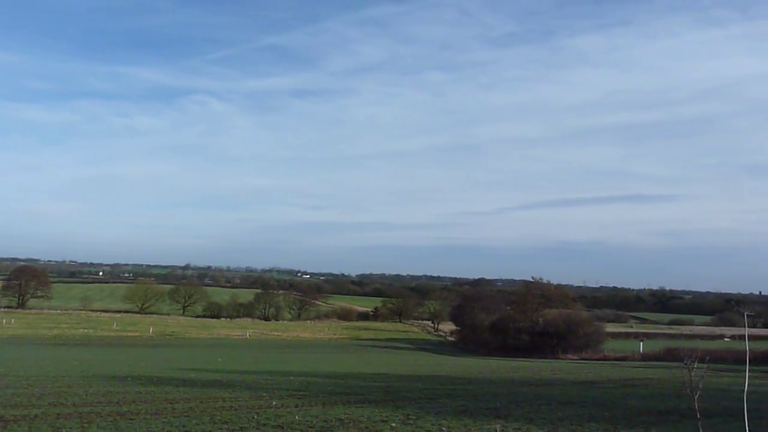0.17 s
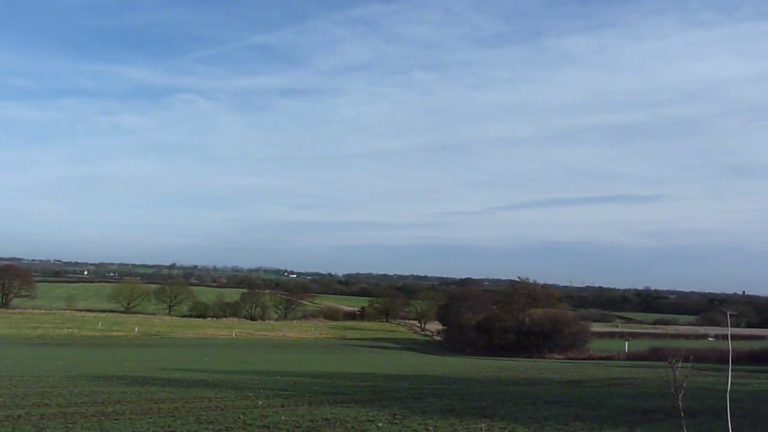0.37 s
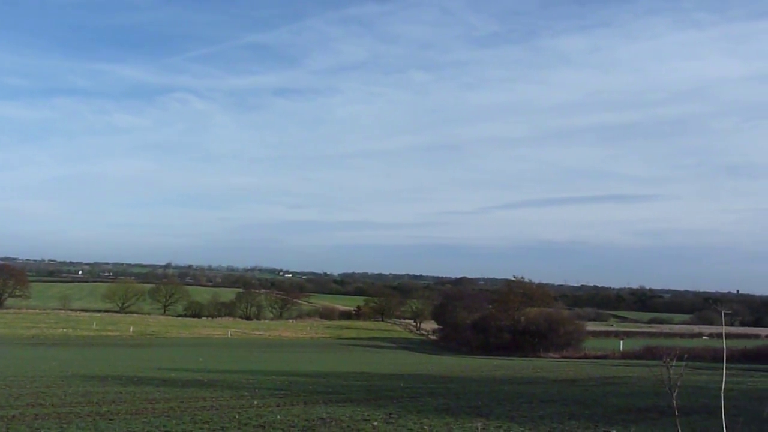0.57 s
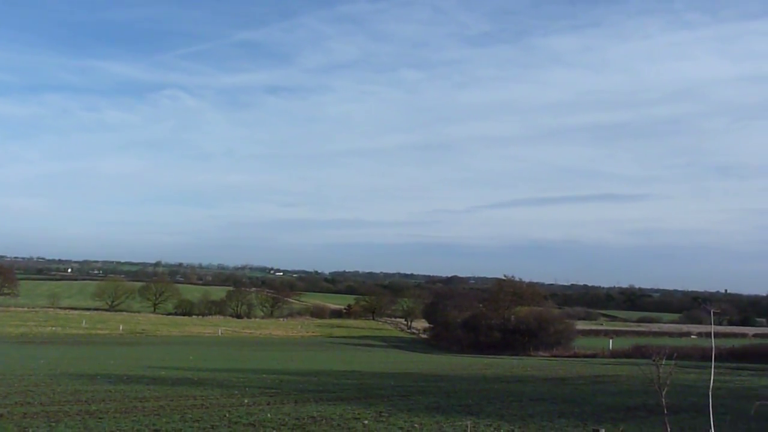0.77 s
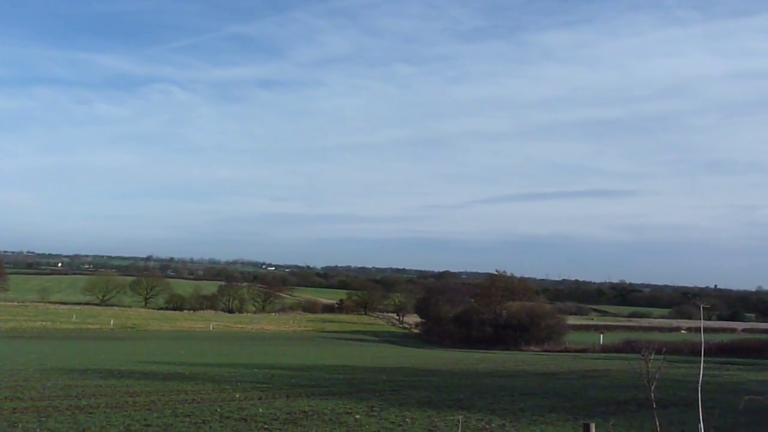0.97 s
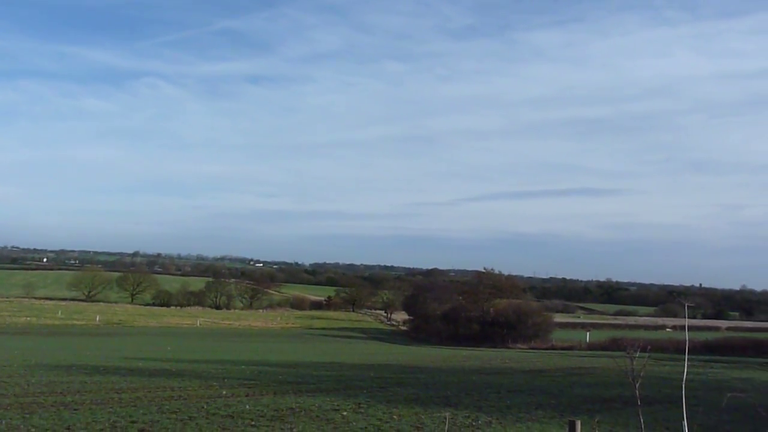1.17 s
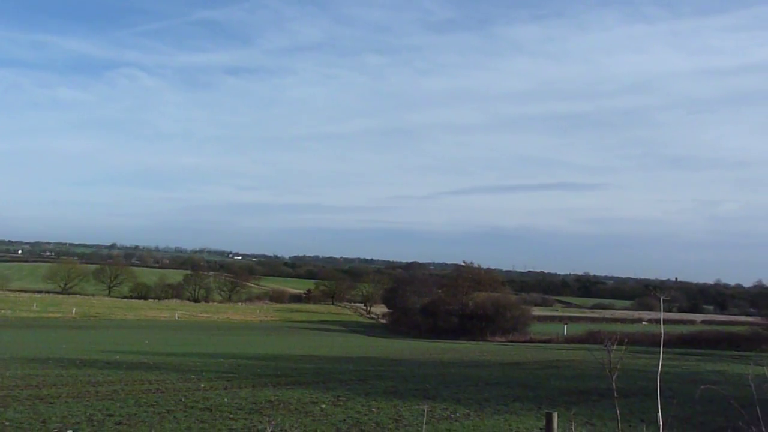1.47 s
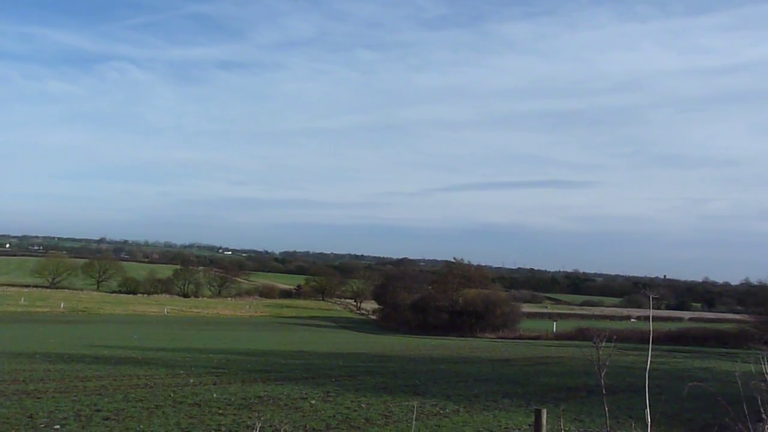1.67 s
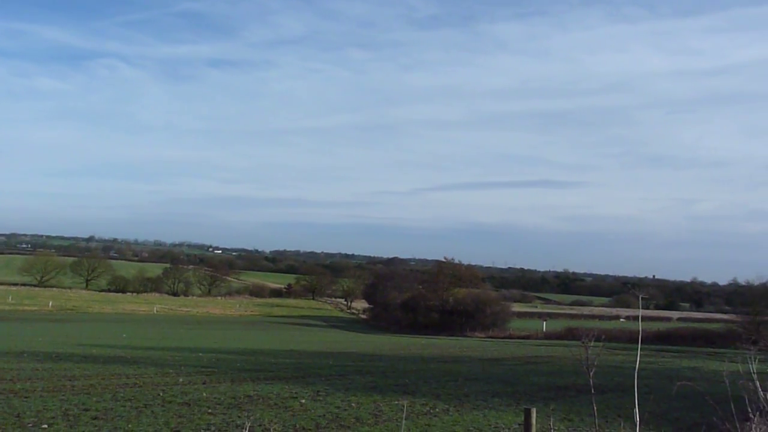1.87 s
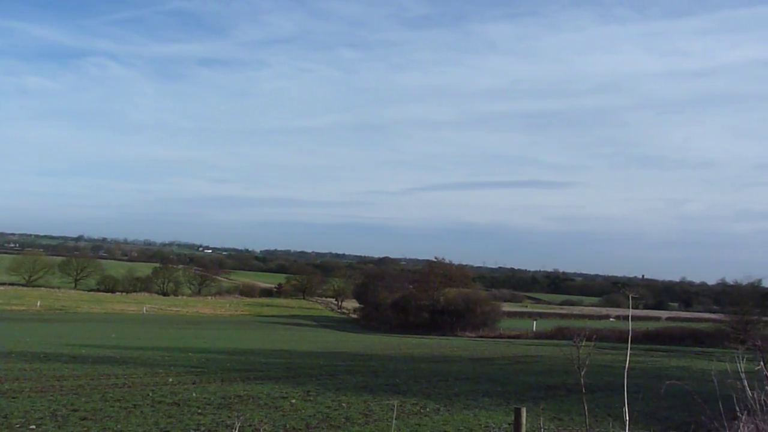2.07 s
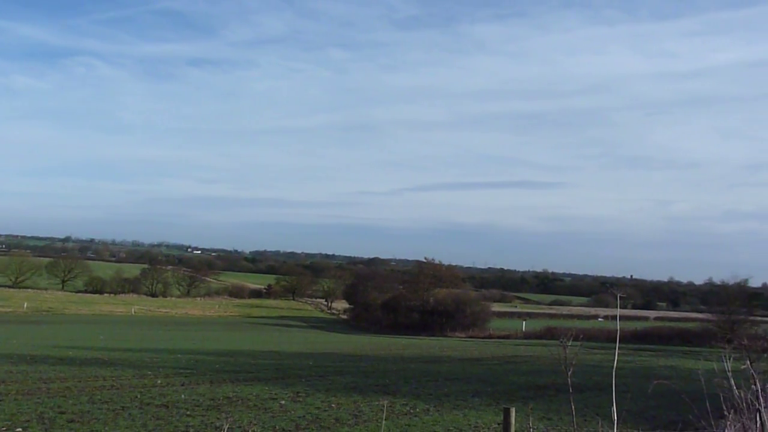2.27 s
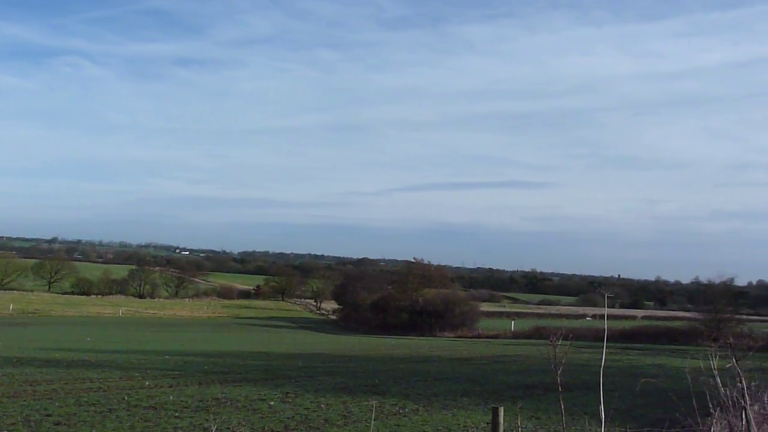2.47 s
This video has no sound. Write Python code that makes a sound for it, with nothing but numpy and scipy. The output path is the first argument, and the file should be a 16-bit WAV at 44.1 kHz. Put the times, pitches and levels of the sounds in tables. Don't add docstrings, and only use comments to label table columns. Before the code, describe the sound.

Small birds sing over a steady low distant traffic rumble and faint hiss. From 0 to 0.8 s, high falling slurs on the right overlap a clear low-high-low central whistle; a harsh call sweeps upward at 0.5 s. Brief buzzes come at 0.7 and 1.3 s, then sparse left chips until 2.5 s. Wind buffets at 1.4 s, a twig snaps right at 2.2 s, and low wind thumps hit around 2.4-2.5 s.

```python
import sys
import numpy as np
from scipy import signal
from scipy.fft import rfft, irfft, next_fast_len
from scipy.io import wavfile
from scipy.ndimage import uniform_filter1d, map_coordinates

SR = 44100
rng = np.random.default_rng(int(sys.argv[2]) if len(sys.argv) > 2 else 0)


def transcribe(signal):
    frames = np.atleast_2d(signal).T
    limited = np.clip(frames, -1, 1)
    pcm = np.round(limited * 32767).astype(np.int16)
    wavfile.write(sys.argv[1], SR, pcm)


def level_to_linear(level):
    exponent = np.asarray(level, float) / 20
    return 10 ** exponent


N = 115101
CAMERA_HZ = 16000

# pitch_hz, level_db (per Hz)
ROAR_TONE = [(15, -44.5), (25, -12.5), (80, 0), (109, -8.5), (342, -11.5), (541, -15), (643, -12.5),
             (1040, -18), (2400, -42), (3120, -81.5), (5280, -120)]
# time_s, level_db
ROAR_SWELL = [(0.0, -49), (0.55, -48.5), (1.29, -48), (1.56, -49.5), (2.11, -48.5), (2.61, -46.5)]
# centre_hz, width_hz, level_db
ENGINE_DRONES = [(325, 97, -56.5), (973, 4.2, -76), (63, 30, -64)]
# pitch_hz, wander_hz, level_db
ENGINE_ORDERS = [(82.4, 6.31, -50), (495.7, 1.3, -61.5)]
# time_s, level_db
GUSTS = [(0, -66.5), (.27, -71), (.38, -59), (.48, -75), (.72, -62.5), (.87, -79), (1.08, -64),
         (1.17, -70.5), (1.23, -59), (1.33, -74), (1.40, -47.5), (1.50, -62.5), (1.78, -59), (1.88, -70),
         (1.98, -58.5), (2.20, -78.5), (2.42, -45), (2.61, -49.5)]
# pitch_hz, level_db (per Hz)
BUFFET_TONE = [(12, -6), (25, -2.5), (55, -3.5), (90, 7), (140, -5.5), (250, -43.5)]
# pitch_hz, level_db (per Hz)
FLAP_TONE = [(80, -17.5), (140, 1.5), (250, -7), (450, -16.5), (700, -53.5)]
# time_s, pitch_hz, level_db
SLUR_PHRASES = [
    [(.004, 7750, -65), (.02, 7550, -66), (.042, 7380, -63), (.053, 6950, -67), (.062, 6450, -60),
     (.068, 6150, -74.5)],
    [(.142, 7550, -70), (.160, 7400, -76), (.175, 7100, -63), (.190, 6750, -62), (.197, 6200, -60),
     (.205, 5750, -73)],
    [(.328, 6150, -75), (.340, 5950, -62.5), (.350, 5650, -56), (.364, 5100, -58), (.372, 4800, -62.5),
     (.378, 4500, -68)],
    [(.378, 4050, -65), (.39, 3980, -73), (.40, 4000, -70), (.42, 3920, -81)],
    [(.446, 6400, -72), (.455, 6620, -61), (.463, 6720, -72), (.475, 6500, -69), (.488, 6200, -67),
     (.497, 6100, -68.5)],
    [(.728, 5900, -82), (.740, 5700, -66.5), (.752, 5580, -64), (.763, 5450, -70), (.770, 5250, -60),
     (.779, 4880, -67), (.786, 4450, -72), (.797, 4280, -73)],
]
# start_s, length_s, start_pitch_hz, end_pitch_hz, level_db
SLUR_NOTES = [
    (.074, 0.017, 5900, 5820, -67.5),
    (.245, 0.04, 6900, 6760, -72),
    (.545, 0.0087, 5250, 4950, -62.5),
    (.848, 0.014, 4300, 4100, -77),
    (.862, 0.011, 3760, 3980, -72),
]
# start_s, length_s, start_pitch_hz, end_pitch_hz, level_db
CHIP_NOTES = [(.793, .046, 4320, 3570, -65), (1.602, 0.03, 3750, 3980, -69),
              (1.616, 0.034, 5160, 5350, -69), (1.652, .030, 5250, 5060, -78.5),
              (1.803, 0.044, 4310, 3520, -65), (2.008, 0.017, 5300, 5170, -76),
              (2.124, 0.026, 5280, 4970, -68), (2.262, 0.023, 5300, 5050, -72),
              (2.372, 0.047, 5330, 4970, -66.5), (2.492, 0.031, 5300, 5000, -71.5),
              (1.320, .025, 4570, 4450, -71), (1.525, 0.045, 4050, 3800, -74),
              (.015, 0.042, 4540, 4420, -62.5)]
# time_s, pitch_hz, level_db
WHISTLE_OPENING = [(0.05, 3493, -67), (0.064, 3270, -58), (0.088, 3183, -58), (0.126, 3200, -56.5),
                   (0.135, 3170, -68)]
# time_s, pitch_hz, level_db
WHISTLE_PEAK = [(.2, 3950, -63), (.206, 3970, -58), (.228, 3860, -53.5), (.246, 3874, -52),
                (0.255, 3986, -61.5), (0.293, 4040, -63.5), (.305, 3710, -61.5), (.312, 3160, -66)]
# time_s, pitch_hz, level_db
WHISTLE_CLOSE = [(.312, 3140, -63), (.322, 2700, -67.5), (.35, 2726, -64.5), (.40, 2856, -71),
                 (.425, 2832, -70), (.46, 2720, -81)]
# time_s, pitch_hz, level_db, half_pitch_lines_db
RISING_CALL = [(.493, 2230, -73, 2), (.499, 2310, -72, -3), (.512, 2570, -62, -3.5),
               (.524, 3205, -64.5, -6.5), (.534, 3294, -64.5, -21.5), (.547, 4250, -57, -32),
               (.558, 4450, -59, -46), (.569, 4270, -50.5, -36), (.582, 4420, -64, -45)]
# time_s, pitch_hz, level_db
RISING_TAIL = [(.584, 4380, -72), (.60, 4400, -70), (.622, 4370, -72), (.645, 4420, -66.5),
               (.672, 4330, -78), (.69, 4470, -76), (.72, 4340, -80.5)]
# pitch_hz, level_db
THROAT_TONE = [(1200, -30), (2200, 1), (4400, 0), (5200, 6), (6400, 12), (7000, 10), (7600, -12),
               (8400, -60)]
# pitch_hz, left_minus_right_db
RISING_PAN = [(3500, -14.5), (4500, -20.5), (6500, -4.5)]
# start_s, length_s, level_db
BUZZ_CHIPS = [
    (0.705, 0.027, -62.5),
    (1.28, 0.029, -65),
]
# start_s, level_db
TWIG_CRACKS = [
    (2.192, -55),
    (2.197, -54),
    (2.204, -43),
    (2.217, -49),
    (2.224, -53),
]
# centre_hz, width_hz
TWIG_MODES = [(3800, 1000), (6100, 900)]
# time_s, level_db, pitch_hz, left_minus_right_db
WIND_PUSHES = [
    (2.483, -30, 95, -6),
    (2.500, -34, 290, -2),
    (2.428, -35, 90, 0),
]
# pitch_hz, level_db (per Hz)
HISS_TONE = [(250, -16), (800, 9), (1500, 6), (2500, 0.5), (4000, -1.5), (6500, 0), (7400, -4), (8000, -14)]
# centre_hz, half_width_hz
WHINE_NOTCHES = [(2600, 347), (4600, 283), (5430, 130), (7930, 230)]


def unit(x):
    return x / np.sqrt(np.mean(x ** 2) + 1e-20)


def along(points, hz):
    f, v = np.transpose(points)
    return np.interp(np.log(hz + 1), np.log(f + 1), v)


def curves(rows):
    s, *columns = np.transpose(rows)
    return [np.interp(np.arange(N) / SR, s, c) for c in columns]


def wobble(rate):
    knots = rng.standard_normal(int(N / SR * 400) + 4)
    return map_coordinates(knots, [np.arange(N) * min(rate, 400) / SR])


def filtered(x, response):
    m = next_fast_len(N + SR // 2)
    return irfft(rfft(x, m) * response(np.fft.rfftfreq(m, 1 / SR)), m)[..., :N]


def patchy(patchy_db):
    z = signal.stft(rng.standard_normal(N + 1024), nperseg=512)[2]
    field = uniform_filter1d(rng.standard_normal(z.shape), 5, 0)
    field = uniform_filter1d(field, 12, 1)
    return signal.istft(z * level_to_linear(patchy_db * unit(field)), nperseg=512)[1][:N]


def between_ports(pan_db):
    return level_to_linear(pan_db * np.array([[.5], [-.5]]))


def placed(x, pan, lag_s):
    side = np.array([[.5], [-.5]])
    return filtered(x, lambda hz: level_to_linear(side * along(pan, hz)) * np.exp(-2j * np.pi * hz * side * lag_s))


def hedges(x, wet_db, t60):
    t = np.arange(SR // 2) / SR
    build_up = 1 - np.exp(-t / 0.0078)
    tail = rng.standard_normal((2, len(t))) * level_to_linear(-60 * t / t60) * build_up
    tail = signal.sosfilt(signal.butter(2, 4500, fs=SR, output='sos'), tail)
    echoes = signal.fftconvolve(x, tail / np.linalg.norm(tail[0]), axes=1)[:, :N]
    return x + level_to_linear(wet_db) * echoes


def traffic():
    swell_db, = curves(ROAR_SWELL)
    roar = unit(filtered(patchy(1.0), lambda hz: level_to_linear(along(ROAR_TONE, hz))))
    out = level_to_linear(swell_db + 2.5 + 0.82 * wobble(5.77)) * roar
    for hz, width_hz, db in ENGINE_DRONES:
        drone = filtered(rng.standard_normal(N), lambda f: 1 / (1 + ((f - hz) / width_hz * 2) ** 2))
        out += level_to_linear(db) * unit(drone)
    for hz, wander_hz, db in ENGINE_ORDERS:
        phase = 2 * np.pi * np.cumsum(hz + wander_hz * wobble(8)) / SR
        out += level_to_linear(db + 3.85 * wobble(6.74)) * np.sin(phase)
    return placed(out, [(1000, 0.58)], -0.000046)


def wind():
    gust_db, = curves(GUSTS)
    lumps = level_to_linear(2.7 * np.array([wobble(14), wobble(13)]))
    push = unit(filtered(rng.standard_normal((2, N)), lambda hz: level_to_linear(along(BUFFET_TONE, hz))))
    flap = unit(filtered(rng.standard_normal((2, N)), lambda hz: level_to_linear(along(FLAP_TONE, hz))))
    flap_db = -67 + 1.38 * (gust_db + 58.5)
    return lumps * (level_to_linear(gust_db + 2) * push + level_to_linear(flap_db) * lumps * flap)


def phrase(rows, rough):
    hz, db = curves(rows)
    t = np.arange(N) / SR
    edge = np.clip(np.minimum(t - rows[0][0], rows[-1][0] - t) / .003 + .5, 0, 1)
    shaken_hz = hz * (1 + rough * .002 * wobble(300))
    level = level_to_linear(db + rough * (wobble(170) - .5))
    return np.sqrt(2) * edge * level * np.sin(2 * np.pi * np.cumsum(shaken_hz) / SR)


def notes(rows, bend, flutter_db, edge_s):
    out, t = np.zeros(N), np.arange(N) / SR
    flutter = level_to_linear(flutter_db * wobble(140))
    for s, length, hz0, hz1, db in rows:
        u = np.clip((t - s) / length, 0, 1)
        edge = np.clip(np.minimum(u, 1 - u) * length / min(edge_s, length / 3), 0, 1)
        phase = 2 * np.pi * np.cumsum(hz0 + (hz1 - hz0) * u ** bend) / SR
        out += level_to_linear(db) * np.sqrt(2) * np.sin(edge * np.pi / 2) ** 2 * np.sin(phase)
    return out * flutter


def slurring_bird():
    voice = sum(phrase(p, 5) for p in SLUR_PHRASES)
    voice = voice + notes(SLUR_NOTES, 1.5, 2.5, .006) + buzzes()
    return hedges(placed(voice, [(5000, -17), (7500, -9)], -.0001), -10, .2)


def chipping_bird():
    chips = notes(CHIP_NOTES, 1.1, 1.8, .01)
    return hedges(placed(chips, [(3800, 5), (5200, 12)], -.0001), -16, .2)


def whistling_bird():
    whistle = sum(phrase(p, 0.93) for p in (WHISTLE_OPENING, WHISTLE_PEAK, WHISTLE_CLOSE))
    return hedges(placed(whistle, [(3000, .1)], -0.0000084), -11.5, 0.17)


def rising_call():
    hz, db, half_db = curves(RISING_CALL)
    t = np.arange(N) / SR
    jitter = 0.0052 * wobble(380) * level_to_linear(half_db / 2)
    phase = np.pi * np.cumsum(hz * (1 + jitter)) / SR
    stack = np.zeros(N)
    for k in range(1, 8):
        line_db = along(THROAT_TONE, k * hz / 2) + k % 2 * half_db + 4.5 * wobble(280)
        stack += level_to_linear(line_db) * np.sin(k * phase)
    breath = unit(filtered(rng.standard_normal(N), lambda f: level_to_linear(along(THROAT_TONE, f))))
    stack = stack + level_to_linear(half_db + 7) * breath
    sounding = (t > RISING_CALL[0][0]) * (t < RISING_CALL[-1][0])
    return np.sqrt(2) * level_to_linear(db) * stack * sounding


def rising_bird():
    voice = rising_call() + phrase(RISING_TAIL, 6)
    return hedges(placed(voice, RISING_PAN, -.0001), -11, .35)


def buzzes():
    upper_hz, pulse_hz, rise = 4980, 110, .2
    out, t = np.zeros(N), np.arange(N) / SR
    rasp = .6 * unit(filtered(rng.standard_normal(N), lambda f: np.exp(-((f - 4500) / 900) ** 2)))
    for s, length, db in BUZZ_CHIPS:
        cycle = (t - s) * pulse_hz % 1
        phase = 2 * np.pi * np.cumsum(upper_hz * (1 + rise * (cycle - .5) + .03 * wobble(350))) / SR
        body = np.sin(np.pi * np.clip((t - s) / length, 0, 1)) * (.5 + np.sin(np.pi * cycle) ** 2)
        lines = np.sin(phase) + level_to_linear(-3) * np.sin(.81 * phase)
        out += level_to_linear(db + 2.0 * wobble(200)) * body * (lines + rasp)
    return out


def twig_snap():
    t, cracks = np.arange(N) / SR, np.zeros((2, N))
    for s, db in TWIG_CRACKS:
        decay = level_to_linear(db - 60 * np.clip(t - s, 0, None) / 0.06) * (t >= s)
        cracks += decay * rng.standard_normal((2, N)) * level_to_linear([[-8], [0]])

    def wood(hz):
        ring = sum(1j * hz * w / (c * c - hz * hz + 1j * hz * w) for c, w in TWIG_MODES)
        band = 1j * hz / (2200 + 1j * hz) / (1 + (hz / 7000) ** 8)
        return band * (.6 + ring)

    return filtered(cracks, wood)


def wind_pushes():
    t, out = np.arange(N) / SR, np.zeros((2, N))
    for s, db, hz, pan_db in WIND_PUSHES:
        u = (t - s) * hz
        swing = np.cos(2 * np.pi * u - .6) * np.exp(-(u - .2) ** 2 / 0.15)
        out -= level_to_linear(db) * between_ports(pan_db) * swing
    return out


def scene():
    birds = slurring_bird() + chipping_bird() + whistling_bird() + rising_bird()
    return traffic() + wind() + birds + twig_snap() + wind_pushes()


def preamp_hiss():
    noise = np.array([patchy(0.71), patchy(0.55)])
    hiss = unit(filtered(noise, lambda hz: level_to_linear(along(HISS_TONE, hz)) * (hz < CAMERA_HZ / 2)))
    return level_to_linear(-61.5) * between_ports(-1) * hiss


def whine_notches(f):
    cuts = [(f - c + .03j * w) / (f - c - 1j * w) for c, w in WHINE_NOTCHES]
    return np.prod(cuts, axis=0) * (f < CAMERA_HZ / 2)


def mirror_image(x):
    half = CAMERA_HZ / 2
    folded = 2 * x * np.cos(2 * np.pi * CAMERA_HZ * np.arange(N) / SR)
    return filtered(folded, lambda f: (f < 8800) * (f > half) * level_to_linear(-4 - ((f - half) / 170) ** 2))


def edge_noise():
    noise = rng.standard_normal((2, N))
    return level_to_linear(-93) * unit(filtered(noise, lambda f: np.exp(-((f - CAMERA_HZ / 2) / 60) ** 2)))


def band_limit(x):
    return signal.sosfilt(signal.butter(12, 8790, fs=SR, output="sos"), x)


def record(dry):
    x = filtered(dry + preamp_hiss(), whine_notches)
    return band_limit(x + mirror_image(x) + edge_noise())


dry = scene()
out = record(dry)
transcribe(out)
```